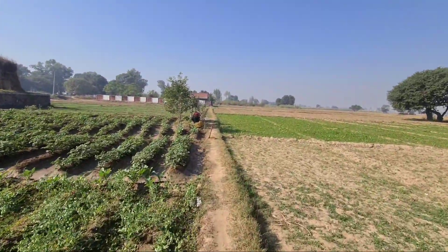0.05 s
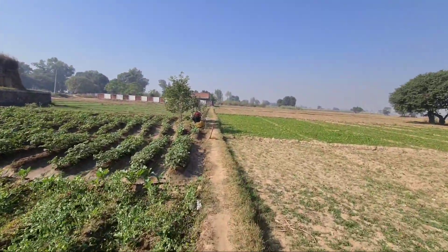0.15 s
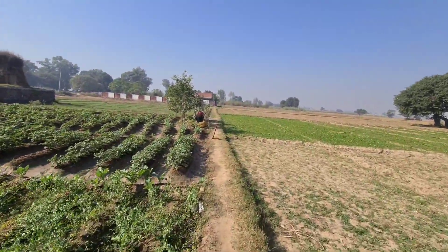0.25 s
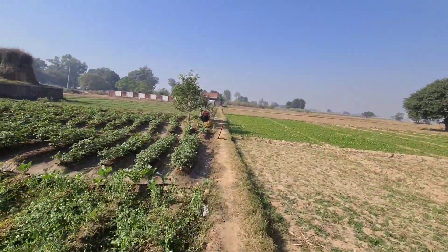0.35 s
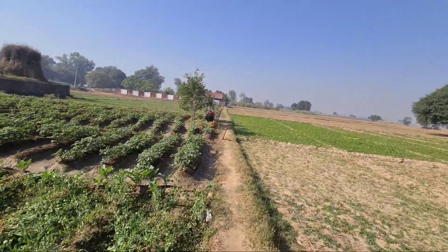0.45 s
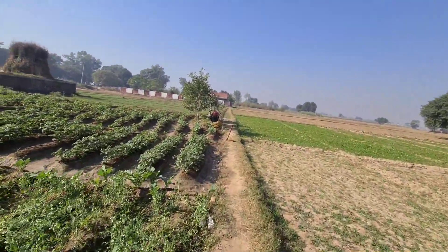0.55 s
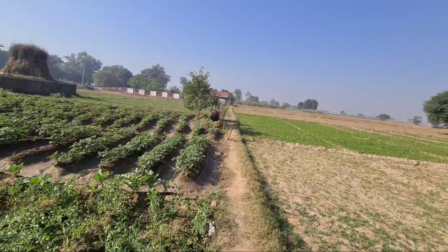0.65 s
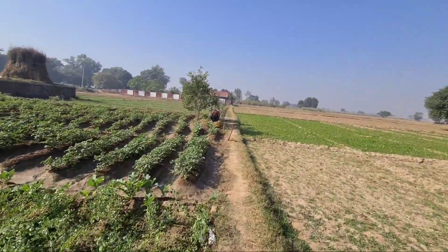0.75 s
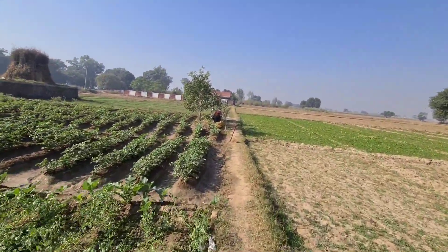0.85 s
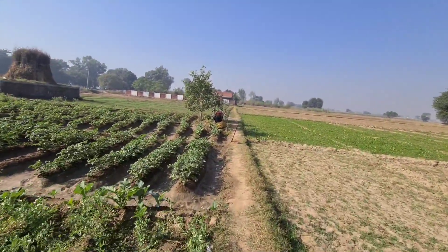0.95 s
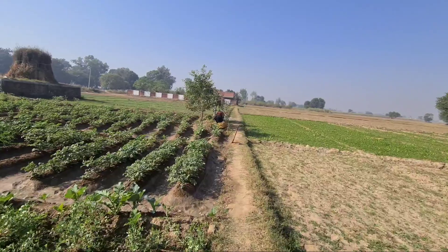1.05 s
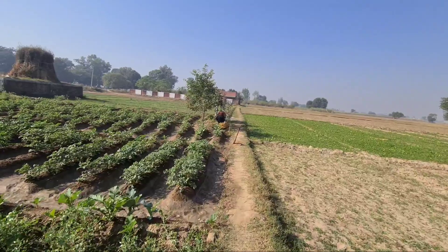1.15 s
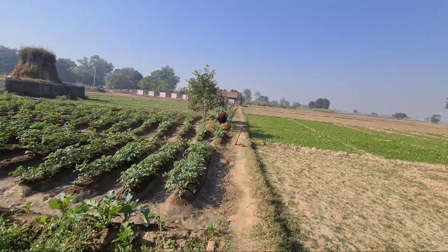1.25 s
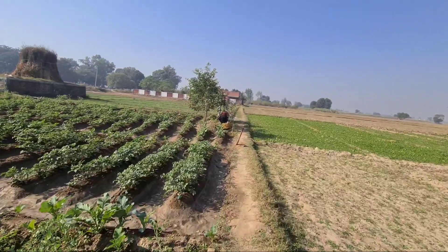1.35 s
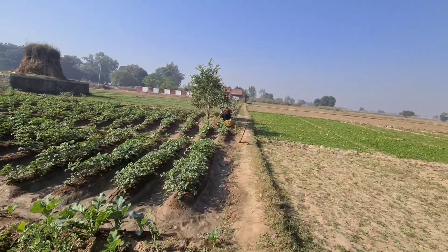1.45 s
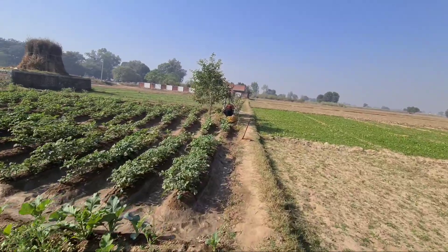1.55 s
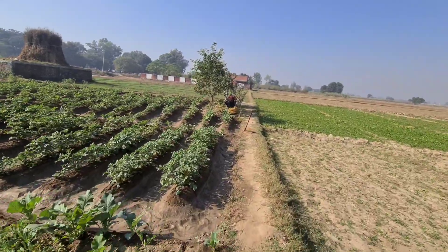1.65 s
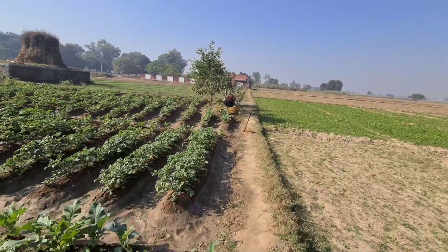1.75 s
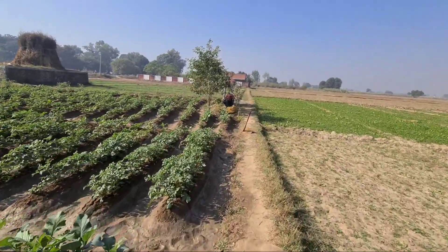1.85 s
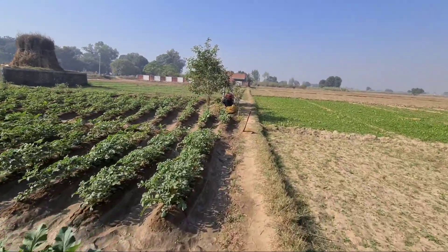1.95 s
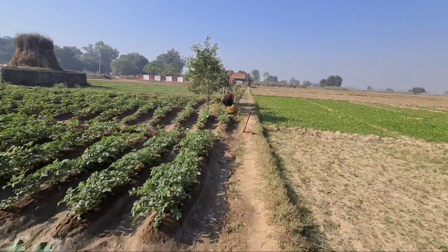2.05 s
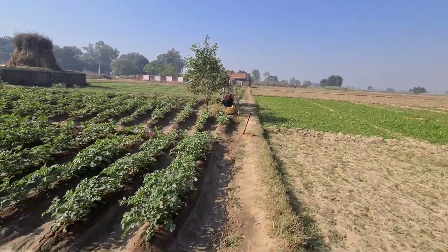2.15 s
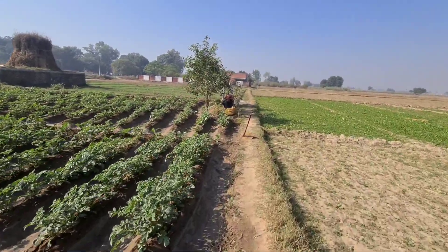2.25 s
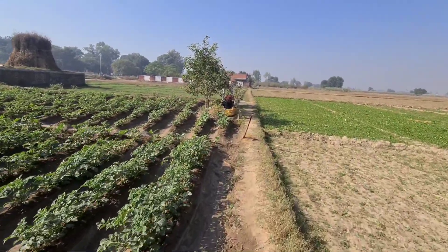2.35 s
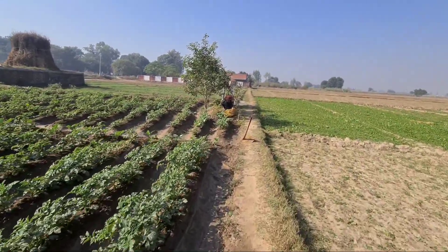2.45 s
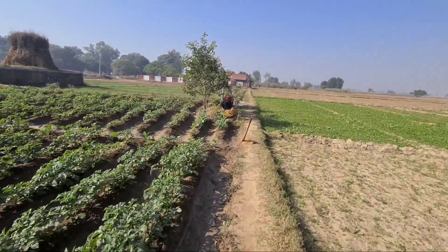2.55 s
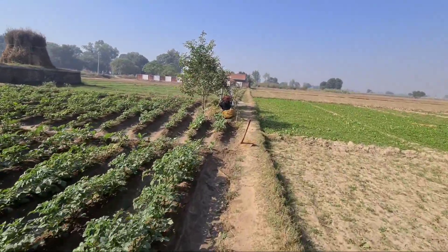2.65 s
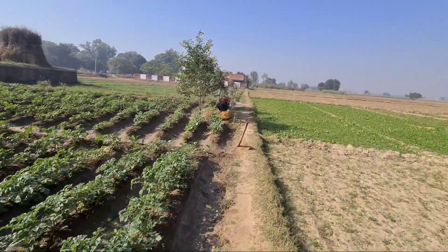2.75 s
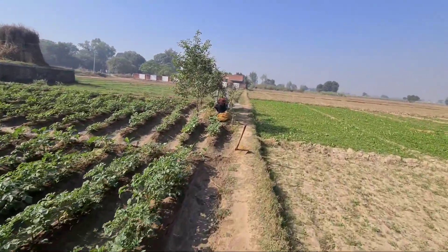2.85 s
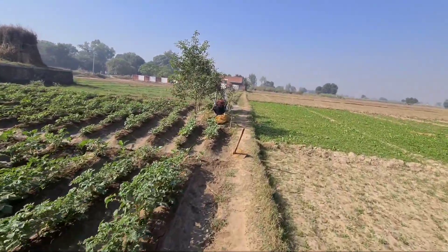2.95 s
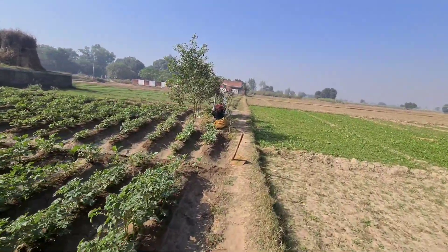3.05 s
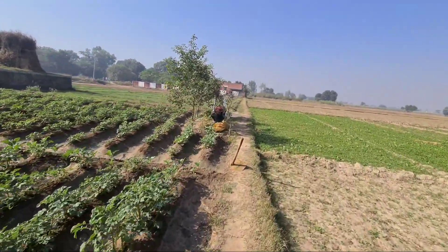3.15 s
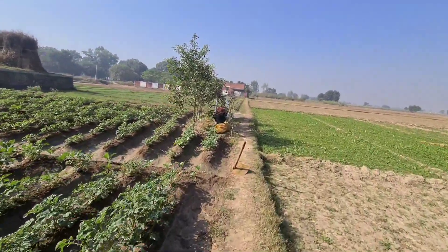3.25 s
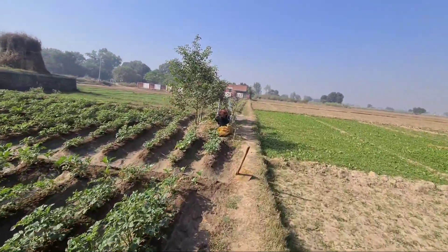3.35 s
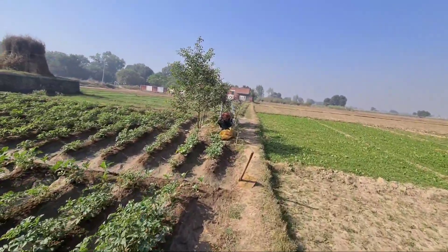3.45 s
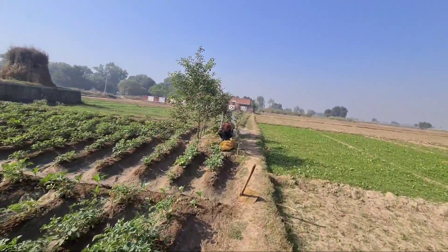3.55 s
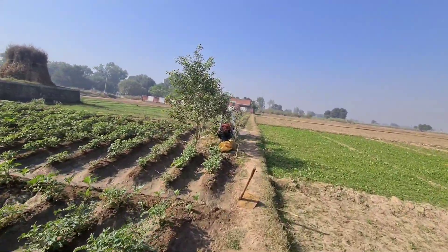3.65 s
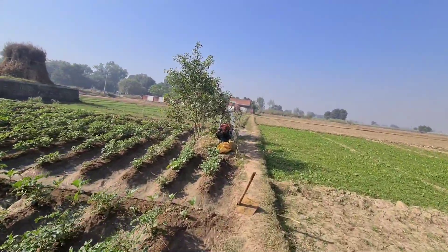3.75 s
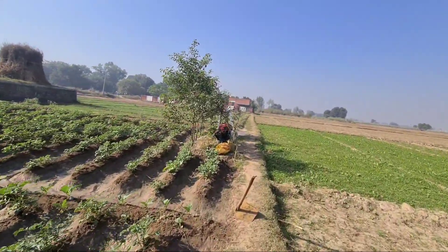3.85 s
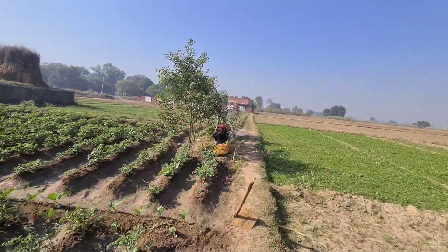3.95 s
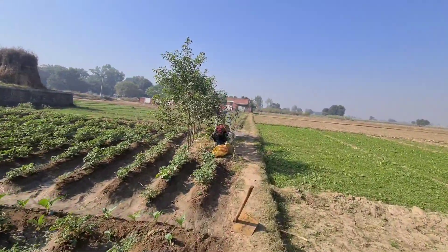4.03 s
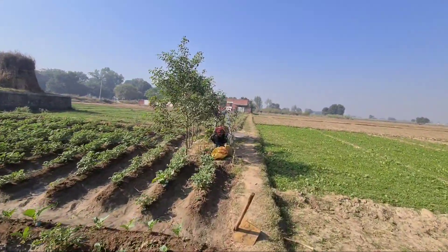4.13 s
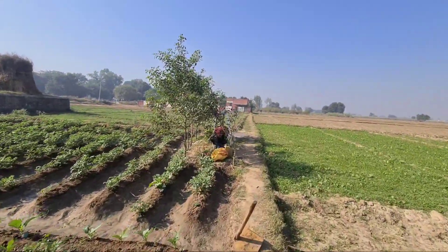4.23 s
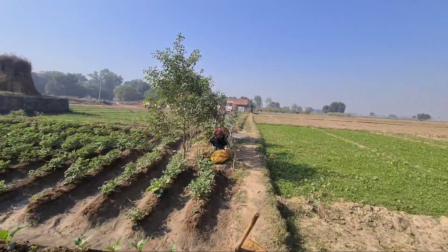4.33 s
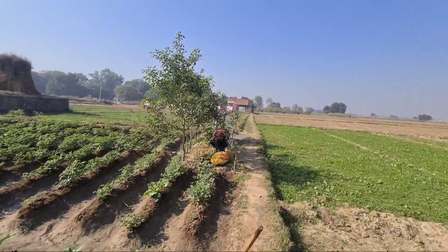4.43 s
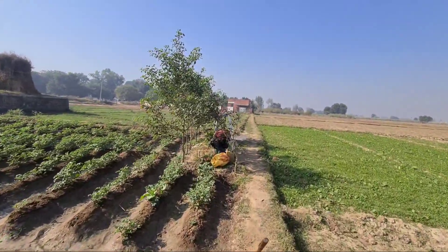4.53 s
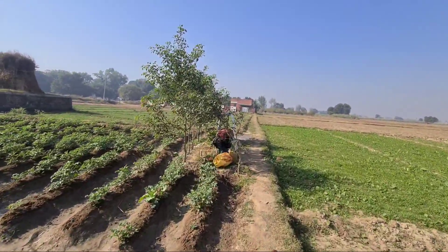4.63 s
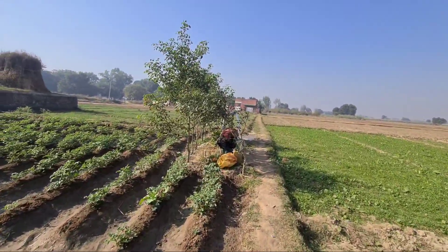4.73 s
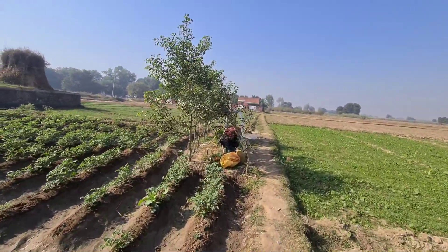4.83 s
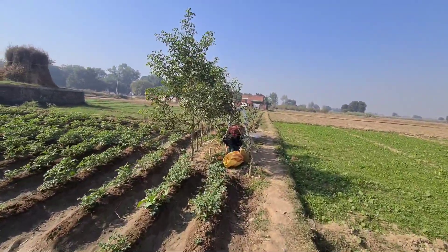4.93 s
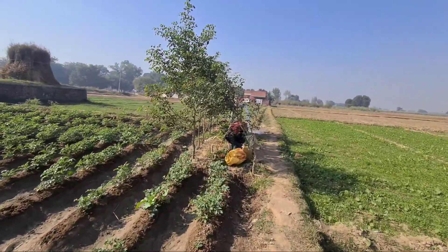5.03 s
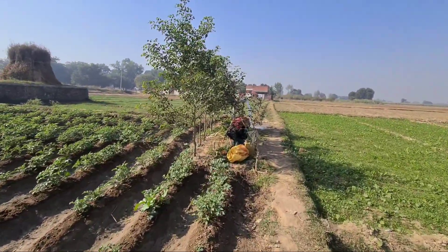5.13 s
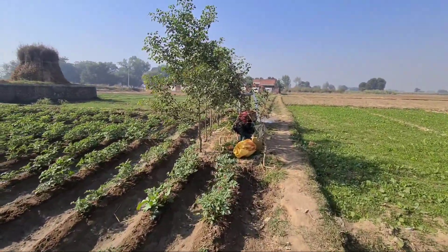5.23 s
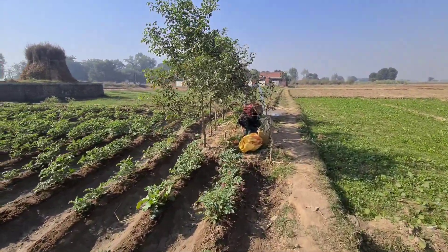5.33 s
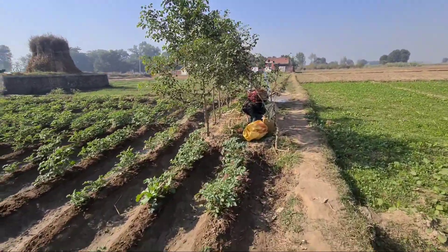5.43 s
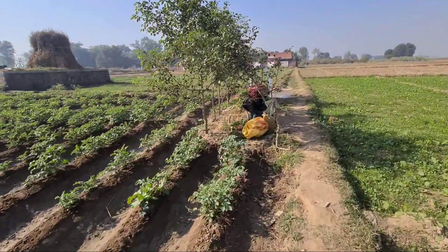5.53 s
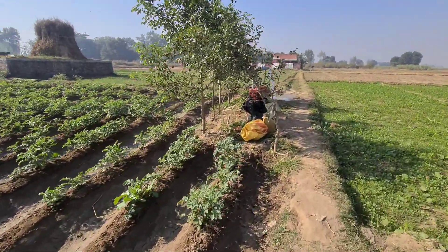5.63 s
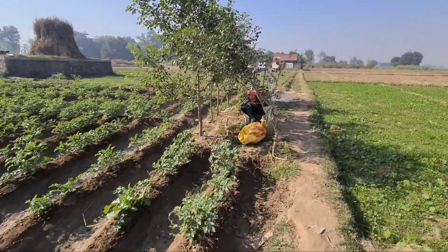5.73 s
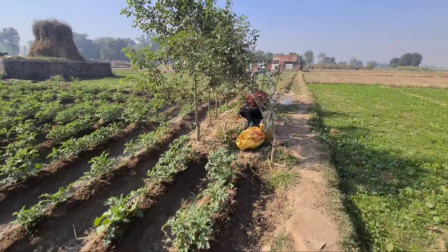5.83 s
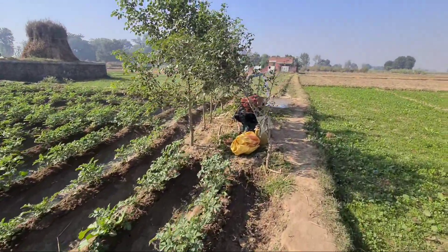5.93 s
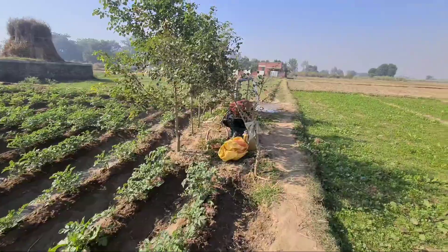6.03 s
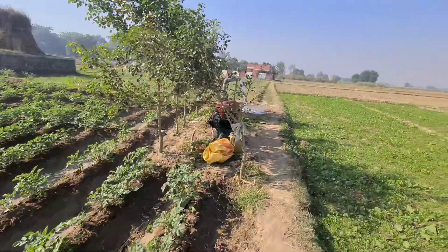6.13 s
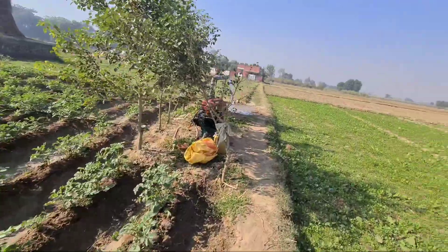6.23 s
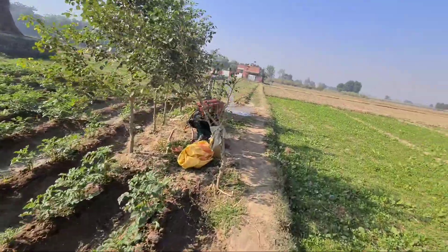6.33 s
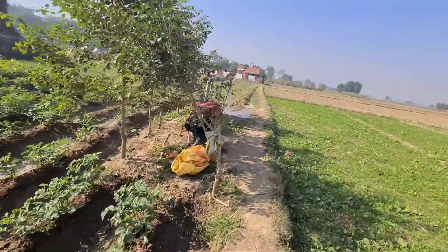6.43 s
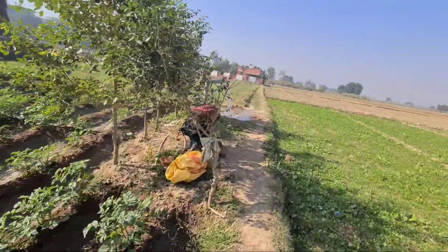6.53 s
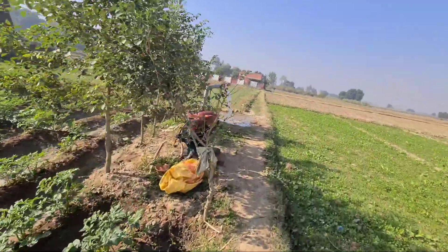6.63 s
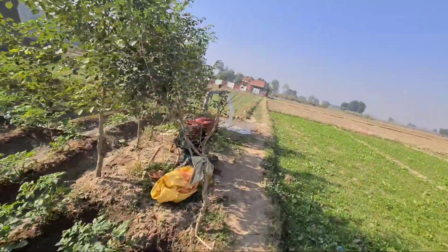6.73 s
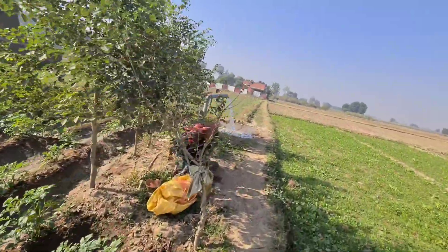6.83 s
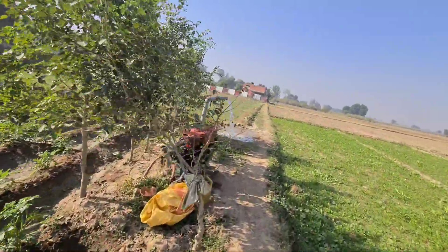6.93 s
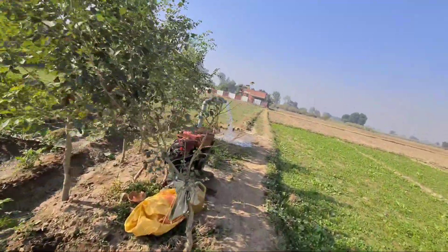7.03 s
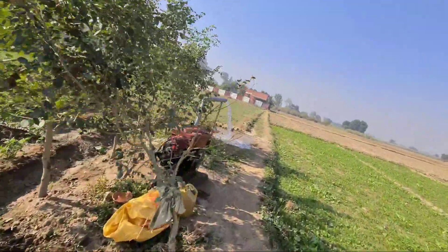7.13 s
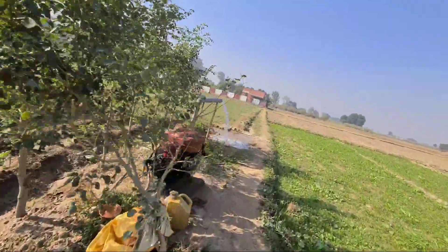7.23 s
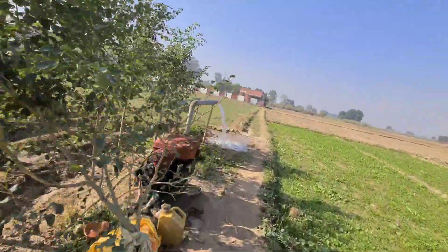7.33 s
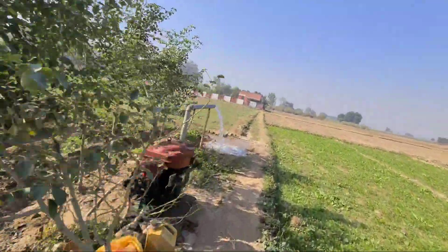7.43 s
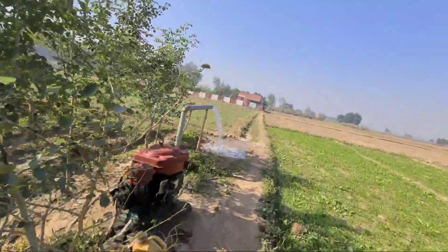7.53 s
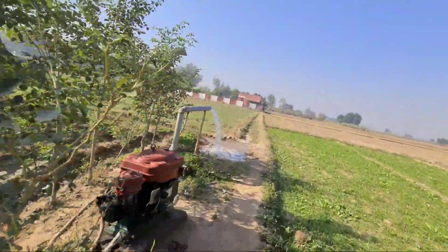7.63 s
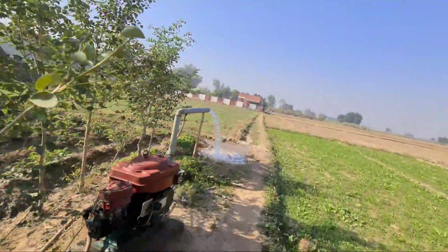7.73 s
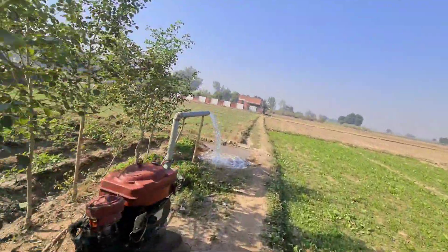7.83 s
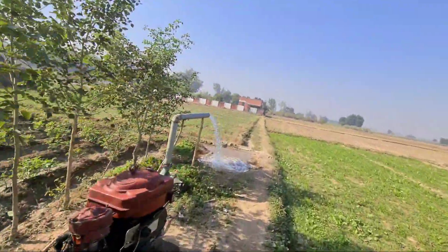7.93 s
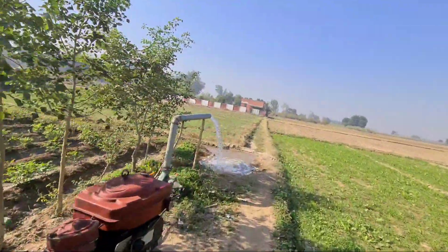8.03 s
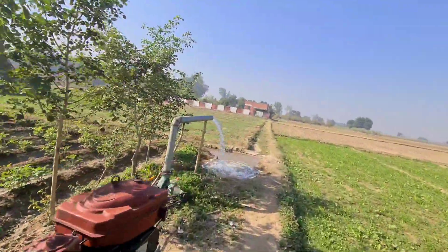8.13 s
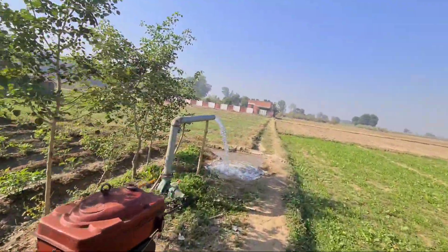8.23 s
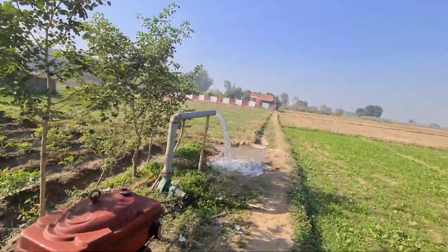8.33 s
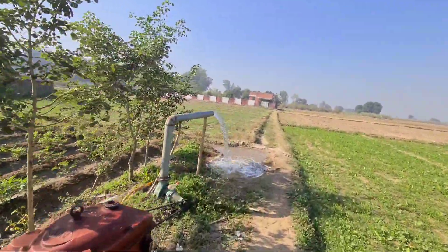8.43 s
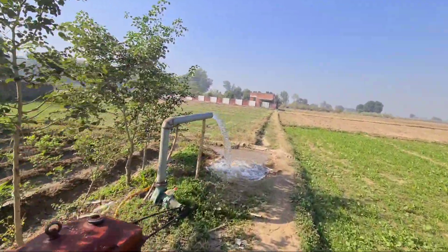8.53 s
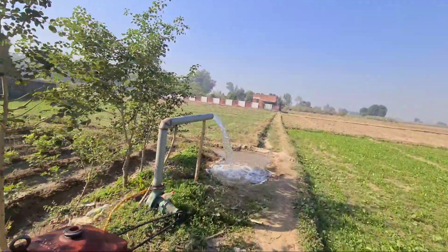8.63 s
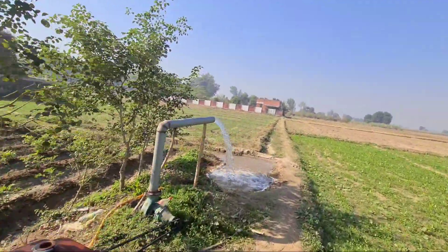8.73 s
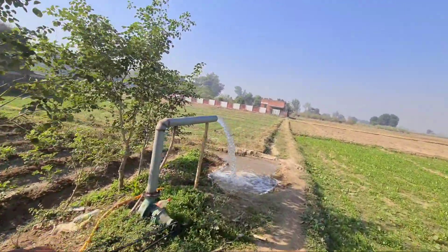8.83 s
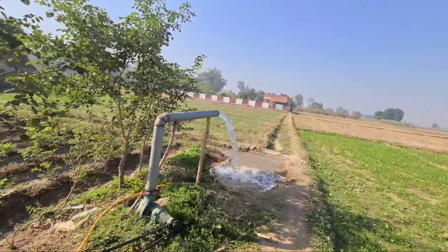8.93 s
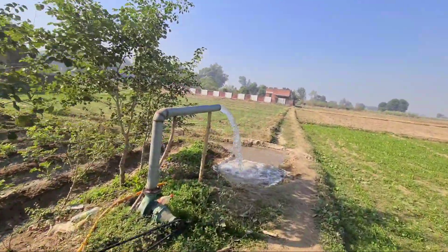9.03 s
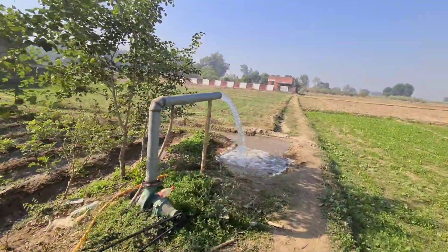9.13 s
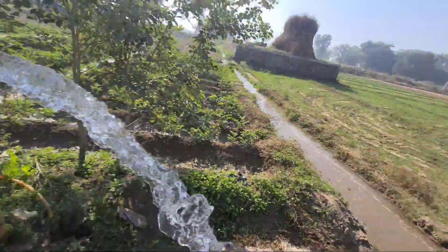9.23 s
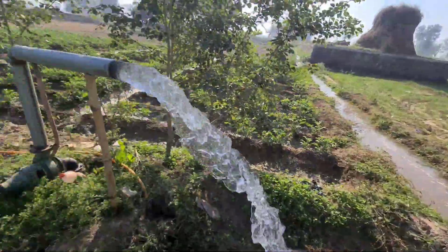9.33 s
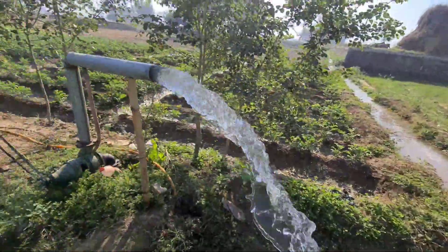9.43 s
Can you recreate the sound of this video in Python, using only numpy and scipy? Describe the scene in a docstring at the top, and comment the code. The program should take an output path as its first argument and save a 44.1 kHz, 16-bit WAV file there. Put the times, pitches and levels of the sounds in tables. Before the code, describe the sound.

A slow one-cylinder diesel engine drives a water pump in an open field, chugging about five and a half times a second with sharp exhaust puffs, thuds and valve ticks. The microphone moves toward it, so the beat grows louder, and metallic knocking and whirring come forward as it passes slightly to the left. Faint wind rumbles underneath. At the very end, water suddenly gushes and splashes from a pipe.

```python
"""Diesel pump on a field path

A slow one-cylinder diesel beats about 5.5 times a second as the listener walks up to it and past it.
Each cycle: the exhaust blast, a thud as the valve shuts, a valve tick with a boom, a breathy intake knock.
Wind, running gear and spray lie underneath; at the very end the scene cuts to a gushing water pipe."""
import sys
import numpy as np
from scipy import signal
from scipy.fft import rfft, irfft, next_fast_len
from scipy.io import wavfile
from scipy.ndimage import map_coordinates

SR = 44100
rng = np.random.default_rng(int(sys.argv[2]) if len(sys.argv) > 2 else 0)


def transcribe(signal):
    """Save signal, clipped to [-1, 1], as a 16-bit WAV file at the path in sys.argv[1]."""
    frames = np.atleast_2d(signal).T
    limited = np.clip(frames, -1, 1)
    pcm = np.round(limited * 32767).astype(np.int16)
    wavfile.write(sys.argv[1], SR, pcm)


N = 418068
TIME_S = np.arange(N) / SR
SCENE_CUT_S = 9.3  # abrupt cut to close water: spray jumps louder, intake knock drops out


def amp(db):
    """dB to gain."""
    return np.exp(np.asarray(db) * (np.log(10) / 20))


def unit(x):
    """x at rms 1."""
    return x / np.sqrt(np.mean(x ** 2) + 1e-20)


def along(points, hz):
    """Interpolate (f/Hz, value) points on a log axis."""
    f, value = np.transpose(points)
    return np.interp(np.log(hz + 1), np.log(f + 1), value)


def curves(rows):
    """One value per sample for each column after t/s."""
    times_s, *columns = np.transpose(rows)
    return [np.interp(TIME_S, times_s, column) for column in columns]


def wobble(rate_hz):
    """Smooth random curve with knots at rate_hz."""
    return map_coordinates(rng.standard_normal(int(N * rate_hz / SR) + 4), [TIME_S * rate_hz])


def filtered(x, response):
    """x through a frequency response."""
    size = next_fast_len(N + 8192)
    return irfft(rfft(x, size) * response(np.fft.rfftfreq(size, 1 / SR)), size)[..., :N]


def slope(points):
    """Response through (f/Hz, level/dB) points."""
    return lambda hz: amp(along(points, hz))


def modes(rows, steep):
    """Response of (f/Hz, width/Hz, level/dB) resonances; steep above 1 deepens the valleys."""
    return lambda f: sum(amp(db) * (f * width / np.hypot(hz * hz - f * f, f * width)) ** steep
                         for hz, width, db in rows)


def swell(t, rise_s, t60_s):
    """Smooth rise to 1 at t = 0, then a decay."""
    return np.exp(-np.where(t < 0, (t / rise_s) ** 2, np.log(1000) * t / t60_s))


def ring(t, hz, rise_s, t60_s):
    """Tone under a swell, crest at t = 0."""
    return np.cos(2 * np.pi * hz * t) * swell(t, rise_s, t60_s)


# Left-right likeness: f/Hz, coherence
COHERENCE = [(30, 1), (60, 0.77), (290, 0.81), (640, 0.95), (1400, 0.66), (3100, 0.31), (6800, 0.017),
             (15000, 0.033)]
def noise(response):
    """Stereo noise of rms 1, less coherent in the treble."""
    size = next_fast_len(N)
    hz = np.fft.rfftfreq(size, 1 / SR)
    alike = np.clip(along(COHERENCE, hz), 0, 1)
    white = rng.standard_normal((2, 2 * len(hz))).view(complex)
    mid, side = irfft(white * response(hz) * np.sqrt([1 + alike, 1 - alike]), size)[:, :N]
    return unit(np.array([mid + side, mid - side]))


# Listener's path: t/s, side view 0-1, right ear lag/ms, ground echo/ms, exhaust gain/dB, body gain/dB
WALK = [(0, 0, -0.097, 0.49, -0.3, 0.7), (.7, 0.06, 0.062, 0.55, -1.3, 2.5),
        (2.6, 0.08, 0.023, 0.63, 1, 0.9), (4.001, 0.26, -0.022, 0.86, 3, 3.2),
        (4.8, 0.26, 0.051, 1.19, 5, 2.65), (5.701, 0.46, -0.098, 1.275, 6, 0.5),
        (6.401, 0.18, .08, 1.39, 4.5, 5), (7.197, 0.13, 0.084, 1.47, 5.5, 8.5),
        (7.6, 0.58, 0.18, 1.7, 5, 10.5), (8.3, 0.98, 0.2, 1.54, 5.5, 10), (9, 0.98, 0.3, 2.4, 5, 13.5),
        (9.48, 0.53, 0.38, 1.727, 5, 12)]
# Mix by layer: base level/dB, exhaust gain weight, body gain weight, side gain/dB, scatter/dB
MIX = dict(thump=(-21, 0.73, 0.067, 0.25, -1.1), bark=(-18.5, 0.07, 0.2953, -2.5, 1.9),
       rasp=(-18, -0.74, -0.12, 7.5, 1.6), hiss=(-23.5, 0.49, 0.1233, -2.5, 0.38),
       thud=(-24, 0.5, 0.07, 5, -0.33), tick=(-47.5, 0.5, 0.01, 6, 1.4), ring=(-42, 1.24, 0.3472, 3, 1.8),
       knock=(-46, -0.13, 1.21, 1, 2), shake=(-41, 0.21, 0.59, 2.5, 1), rumble=(-44, 2, 0.47, -4.6, 1.8),
       whirr=(-48.5, 0.28, 1.0852, -0.4, 0.1), spray=(-61.5, 0.9, 1.06, -1.8, 0.5))
def level_db(layer, at_s, chance):
    """Level of a layer along the walk; one cycle knocks harder."""
    base_db, exhaust_weight, body_weight, side_db, scatter_db = MIX[layer]
    walk_s, side, _, _, exhaust_db, body_db = np.transpose(WALK)
    path_db = base_db + exhaust_weight * exhaust_db + body_weight * body_db + side_db * side
    hard_knock_db = 6.2 if layer == "knock" and abs(at_s - 8.41) < .05 else 0
    return np.interp(at_s, walk_s, path_db) + scatter_db * chance + hard_knock_db


def off_ground(x, share):
    """Add a dull echo off the soil; it comes later as the engine nears, so a hollow colour slides down."""
    side, _, echo_ms = curves(WALK)[:3]
    dull = filtered(x, lambda hz: 1 / (1 + (hz / 2200) ** 2))
    echo = np.array([np.interp(TIME_S - echo_ms / 1000, TIME_S, channel) for channel in dull])
    return x + share * (1 - .92 * side) * echo


def wind():
    """Air stirs at the two ears, unrelated left and right."""
    gusts_db = 7.3 * np.array([wobble(5.01), wobble(7.5)])
    spectrum = slope([(10, 0), (30, 6.5), (60, 11.5), (110, -14), (250, -41)])
    return amp(gusts_db - 46.5) * unit(filtered(rng.standard_normal((2, N)), spectrum))


# Running gear spectra: f/Hz, level/dB
RUMBLE = [(20, -30), (40, -32), (65, 1), (120, -9), (190, 0.5), (260, -11.5), (350, -7.5), (600, -48)]
WHIRR = [(200, -42), (400, 7), (600, -5), (750, 2.5), (900, -2), (1300, -4), (1700, -1.5), (2200, -10.5),
         (3200, -12), (5000, -61)]
def pump():
    """The running gear rumbles and whirrs at a wavering level."""
    rumble_db = level_db("rumble", TIME_S, wobble(2.573)) - 2 + .42 * wobble(36)
    whirr_db = level_db("whirr", TIME_S, wobble(2.573)) - 3 + .63 * wobble(30)
    gear = amp(rumble_db) * noise(slope(RUMBLE)) + amp(whirr_db) * noise(slope(WHIRR))
    return off_ground(gear, share=.85)


# Spray spectrum: f/Hz, level/dB
SPRAY = [(1500, -3), (3000, 1), (4000, 0), (5000, -3), (8000, -4.5), (12000, -7.5), (15300, -5),
         (15700, -35)]
def spray(drops_per_s=45, drop_t60_s=.067, after_cut_db=6):
    """Water hisses, and stray drops spatter."""
    spray_db = level_db("spray", TIME_S, wobble(2.573)) + .92 * wobble(24)
    drops = (rng.random(N) < drops_per_s / SR) * rng.exponential(.83, N)
    spatter = signal.fftconvolve(drops, amp(-60 * TIME_S[:900] / drop_t60_s))[:N]
    return amp(spray_db + after_cut_db * (TIME_S > SCENE_CUT_S)) * (.61 + spatter) * noise(slope(SPRAY))


def bubbles(count, from_s, span_s):
    """Short rising plops where the jet meets the channel."""
    onset, pitch, size = rng.random((count, 3)).T[..., None]
    hz = 500 * 9 ** pitch
    cycles = hz * TIME_S[:500]
    strength = (1 - size) ** -.35 * (hz / 500) ** -.4
    plops = strength * np.sin(2 * np.pi * cycles * (1 + .022 * cycles)) * amp(-9 * cycles)
    index = ((from_s + onset * span_s) * SR).astype(int) + np.arange(500)
    return np.bincount(index.ravel(), plops.ravel(), N + SR)[:N]


# Gush envelope: t/s, level/dB
GUSH = [(0, -50), (9.24, -59), (9.29, -29), (9.34, -37), (9.39, -28.5), (9.425, -25.5), (9.45, -31),
        (9.48, -38)]
# Splash spectrum: f/Hz, level/dB
SPLASH = [(100, -18), (300, 4), (800, 8), (1300, 5.5), (2500, -5.5), (4500, -4), (7000, -11), (11000, -12),
          (15400, -20), (15800, -45)]
def gush():
    """Water leaves the pipe in lumps, splashing and bubbling."""
    splash = amp(3.2 * wobble(86)) * noise(slope(SPLASH))
    return amp(curves(GUSH)[0]) * (splash + .92 * bubbles(count=160, from_s=GUSH[1][0], span_s=.2))


# Stretches of even running, then one early beat after the cut to the water: first t/s, cycle/s, count
PACE = [(-.0299, .1824, 3), (.5173, .18278, 8), (1.9795, .18382, 13), (4.3691, .18326, 8),
        (5.8352, .18367, 20), (9.4364, .18367, 1)]
def firings():
    """Firing times in seconds."""
    return np.concatenate([first_s + cycle_s * np.arange(count) for first_s, cycle_s, count in PACE])


def each_cycle(layer, shape, until_s=np.inf):
    """Sum shape(t, side view, random draws) over the firings, at the layer's level."""
    lead, early = SR // 10, SR // 50
    out, t = np.zeros(N + SR), np.arange(-early, SR // 5) / SR
    times_s, (walk_s, side) = firings(), np.transpose(WALK)[:2]
    for at_s, chance in zip(times_s[times_s < until_s], rng.standard_normal((len(times_s), 4))):
        start = round(at_s * SR) + lead - early
        gain = amp(level_db(layer, at_s, chance[3]))
        out[start:start + len(t)] += gain * shape(t, np.interp(at_s, walk_s, side), chance)
    return out[lead:lead + N]


def filter_housing(t, side, chance):
    """The air filter housing rings in two beats, heard from the side."""
    t = t - .148 - .00017 * chance[0]
    beats = ring(t, 355, .0042, .024) + 1.08 * ring(t - .018, 308, .0061, .02)
    return side ** 2 * amp(.66 * chance[1]) * beats


# Modes of block and covers: f/Hz, front level/dB, side level/dB, t60/s
BLOCK_MODES = [(527, 1.5, -14, 0.13), (710, -1, 6, 0.15), (927, 8, -14, 0.26), (1282, -9, 8, 0.1),
               (1500, -23, 1, 0.079), (1740, -4, 3, 0.029), (2090, -1.5, 4, 0.066), (2590, 3.5, -7, 0.085),
               (3680, 6, -43, 0.037)]
def block_ring(t, side, chance):
    """The knock rings the block; the blow never lands alike."""
    late, rings = t[t > .135], 0
    for hz, front_db, side_db, t60_s in BLOCK_MODES:
        force, lag, detune = rng.standard_normal(3)
        gain = amp(front_db + (side_db - front_db) * side + 3 * force)
        rings += gain * ring(late - .145 - .001007 * lag, hz * (1 + .0088 * detune), .0011, t60_s)
    return np.pad(rings, (len(t) - len(late), 0))


# Block noise bands: f/Hz, width/Hz, level/dB
BLOCK_BANDS = [(590, 710, 11), (860, 240, -11), (1055, 100, 15), (1600, 114, 10), (2390, 150, 4),
               (3600, 300, -43)]
def intake():
    """A breathy knock sets filter housing and block ringing."""
    breath_shape = lambda t, *_: swell(t - .148, .00044, .24)
    knock_shape = lambda t, *_: swell(t - .145, .00071, .065) + .29 * swell(t - .145, .001, .039)
    breath_bands = modes([(305, 230, -1.5), (453, 63, 2.5), (848, 81, 3.5)], steep=1.11)
    breath = each_cycle("ring", breath_shape, SCENE_CUT_S) * noise(breath_bands)
    knock = each_cycle("knock", knock_shape, SCENE_CUT_S) * noise(modes(BLOCK_BANDS, steep=1.2))
    housing = each_cycle("ring", filter_housing, SCENE_CUT_S)
    metal = each_cycle("knock", block_ring, SCENE_CUT_S)
    return amp(13.5) * housing + off_ground(metal + amp(3.5) * breath + amp(6.5) * knock, share=.59)


# Valve gear bands: f/Hz, width/Hz, level/dB
VALVE_BANDS = [(1360, 130, 2), (3750, 160, 5), (5850, 1400, -8), (11400, 870, -7.5)]
def valves():
    """Valves seat at fixed crank angles: a thud with a click, then a tick with a boom; the block shakes."""
    def thud(t, side, chance):
        return ring(t - .0546 + .00068 * side, 222 + 60 * side, .0034, .02 + .012 * side)

    def boom(t, side, chance):
        return amp(.5 * chance[0]) * ring(t - .1052, 192 + 25 * side, .0023, .11 - .1 * side)

    def tick(t, side, chance):
        return (1.1 - .6 * side) * swell(t - .1035, .00066, .026) + .33 * swell(t - .1035, .00069, .048)

    def shake(t, side, chance):
        jolts = swell(t - .056, .0078, .079) + (.5 + .34 * side) * swell(t - .106, .001, .1)
        return amp(1.88 * chance[0]) * jolts

    click = lambda t, side, chance: amp(1.7 * chance[0] - 3 * side) * swell(t - .0502, .00068, .037)
    late_tick = lambda t, side, chance: amp(2.7 * chance[0] - 3) * swell(t - .1435, .001, .041)
    low = amp(3.5) * each_cycle("thud", thud) + amp(-4) * each_cycle("thud", boom)
    impacts = sum(each_cycle("tick", shape) for shape in (tick, click, late_tick))
    ticks = amp(4) * impacts * noise(modes(VALVE_BANDS, steep=1.4))
    rattle = each_cycle("shake", shake) * noise(modes(BLOCK_BANDS, steep=1.73))
    return low + ticks + off_ground(rattle, share=.11)


def blast(peak_s, rise_s, t60_s, tails):
    """Jet envelope; trees and ground draw it out into tails of (level/dB, t60/s)."""
    decays = [(0, t60_s), *tails]
    return lambda t, *_: sum(amp(db) * swell(t - peak_s, rise_s, decay_s) for db, decay_s in decays)


# Eddy pitch range by layer: low f/Hz, high f/Hz
EDDY_RANGE = dict(bark=(1050, 2230), rasp=(2454, 4450))
def eddies(layer, width_hz):
    """Each blast's eddies favour one pitch, drawn towards those the ground echo strengthens."""
    envelope = each_cycle(layer, lambda t, *_: swell(t - .005, .004, .017))
    times_s, (low_hz, high_hz) = firings(), EDDY_RANGE[layer]
    walk_s, _, _, echo_ms = np.transpose(WALK)[:4]
    draw, stray = rng.random((len(times_s), 2)).T
    comb_hz = 1000 / np.interp(times_s, walk_s, echo_ms)
    free_hz = low_hz + (high_hz - low_hz) * draw ** 2.6
    drawn_hz = .4 * free_hz + .6 * np.round(free_hz / comb_hz) * comb_hz
    pitch_hz = np.maximum(drawn_hz * (1 + .2 * (stray - .5)), low_hz)
    cycle = np.searchsorted(times_s, TIME_S + .01) - 1
    phase = 2 * np.pi * np.cumsum(pitch_hz[cycle]) / SR
    narrow = lambda hz: 1 / (1 + (hz / width_hz) ** 2) ** 2
    return envelope * (np.cos(phase) * noise(narrow) + np.sin(phase) * noise(narrow))


# Pipe mouth bands, low and high: f/Hz, width/Hz, level/dB
BARK = [(1140, 220, 2), (1520, 300, -4), (2210, 1200, -4.5)]
RASP = [(3060, 600, -4.5), (3550, 700, 2), (4195, 150, 2)]
# Jet hiss spectrum: f/Hz, level/dB
HISS = [(2500, -0.5), (4500, -0.5), (6000, 0), (9000, -0.5), (11000, -1.5), (13000, 2), (15300, -3),
        (15800, -46), (16800, -95)]
# Weaker hiss on the first blasts: t/s, level/dB
HISS_START = [(.4, -4.5), (.66, 0)]
def exhaust_jet():
    """Gas roars through the pipe mouth for about 10 ms a firing."""
    bark = each_cycle("bark", blast(.0067, .0039, .019, tails=[(-16, .049), (-29, .39)]))
    bark = bark * noise(lambda hz: modes(BARK, steep=2.2)(hz) / (1 + (930 / (hz + 1)) ** 10))
    rasp = each_cycle("rasp", blast(.0054, .0021, .012, tails=[(-12.5, .051), (-40, .47)]))
    rasp = rasp * noise(modes(RASP, steep=1.41))
    hiss = each_cycle("hiss", blast(.0049, .0035, .018, tails=[(-4, .095), (-25, .083)]))
    hiss = hiss * noise(slope(HISS)) * amp(4 + curves(HISS_START)[0])
    whistle = amp(-2) * eddies("bark", width_hz=168) + amp(-7) * eddies("rasp", width_hz=330)
    return off_ground(bark, share=.13) + amp(2) * rasp + hiss + whistle


def pressure_front(t, side, chance):
    """The pressure front as the exhaust valve opens."""
    return (1 + .9 * side) * ring(t + .0003 * (1 - side), hz=330, rise_s=.0008, t60_s=.008)


def gas_thump(t, side, chance):
    """One slow swing of the gas column, then its collapse sucks back and rings the pipe."""
    cutoff = 1 / (1 + np.exp(np.clip((t - .0132) / .0006, -50, 50)))
    swing = np.sin(2 * np.pi * 61 * (t - .0004)) * (t > .0004) * (1.3 + 75 * t) * cutoff
    suction = (1.1 + .5 * side) * swell(t - .017, .0032, .025)
    pipe = (2.3 - 1.2 * side) * amp(.8 * chance[0]) * ring(t - .0149, 228, .0012, .038)
    return -(swing + suction + pipe)


def exhaust_pipe():
    """Under the roar: the pipe's own body, the pressure front and the thump."""
    envelope = each_cycle("thump", blast(.0022, .004, .011, tails=[(-1, .35), (-17, .38)]))
    body = amp(-21) * envelope * noise(modes([(540, 170, 0)], steep=2.2))
    front = amp(.8) * each_cycle("thump", pressure_front)
    return off_ground(front + body, share=.65) + each_cycle("thump", gas_thump)


def scene():
    """Sound reaches the two ears a moment apart as the engine passes to the left."""
    engine = exhaust_jet() + exhaust_pipe() + valves() + intake()
    left, right = engine + pump() + spray() + gush()
    lag_samples = np.round(curves(WALK)[1] * SR / 1000)
    right = map_coordinates(right, [np.arange(N) - lag_samples], order=0, mode="nearest")
    return np.array([amp(-.16) * left, right]) + wind()


def record(dry, bass_hz=42, ceiling=1.05, top_hz=16800):
    """The microphone drops the deepest bass, clips peaks softly and cuts the top treble."""
    thinned = filtered(dry, lambda hz: 1 / np.sqrt(1 + (bass_hz / (hz + 1)) ** 4))
    clipped = thinned / (1 + np.abs(thinned / ceiling) ** 6) ** (1 / 6)
    return filtered(clipped, lambda hz: hz < top_hz)


dry = scene()
out = record(dry)
transcribe(out)
```